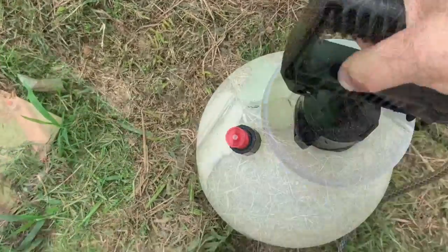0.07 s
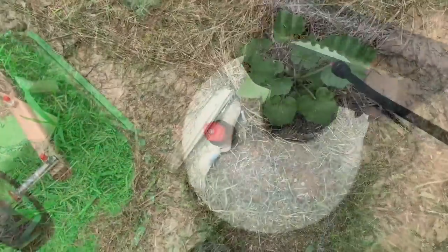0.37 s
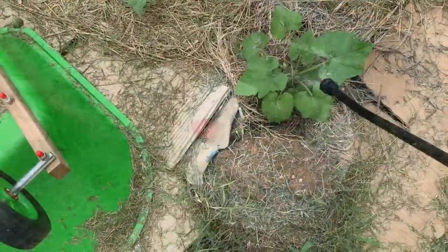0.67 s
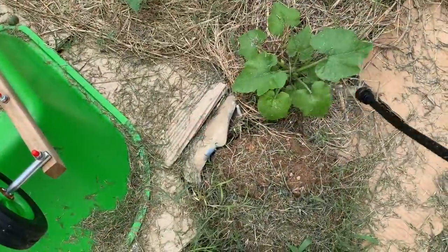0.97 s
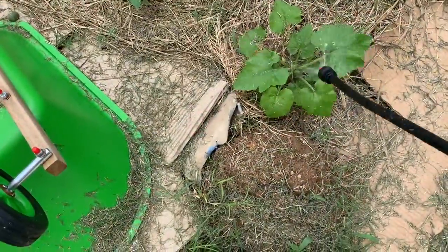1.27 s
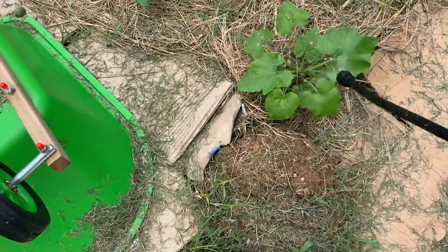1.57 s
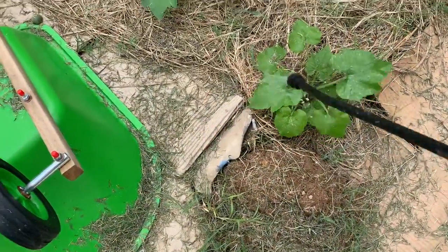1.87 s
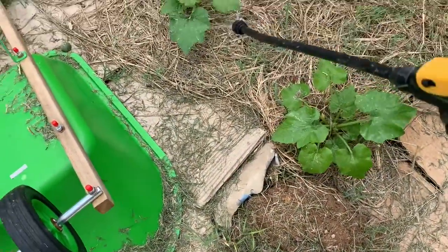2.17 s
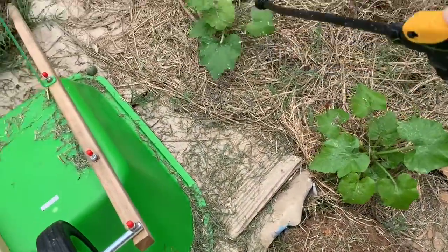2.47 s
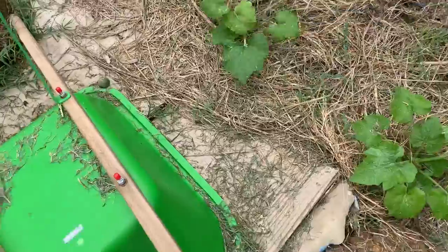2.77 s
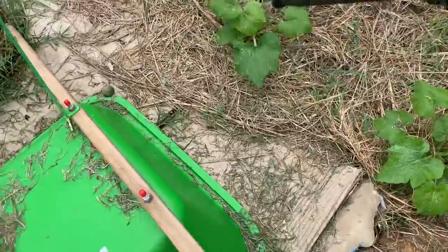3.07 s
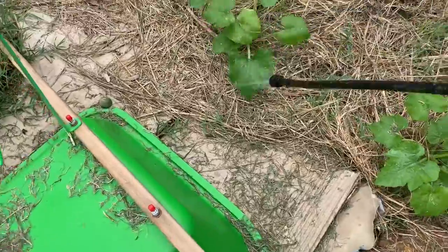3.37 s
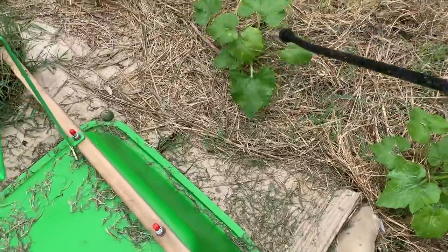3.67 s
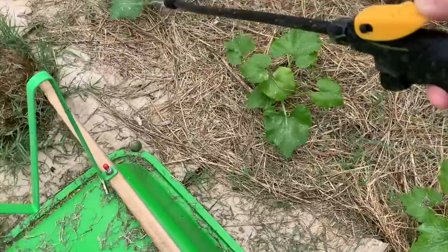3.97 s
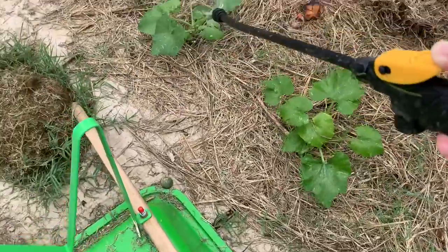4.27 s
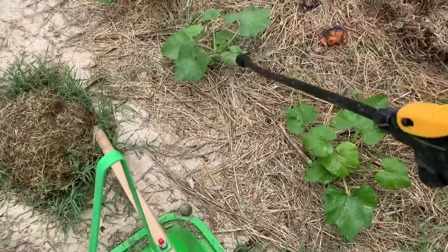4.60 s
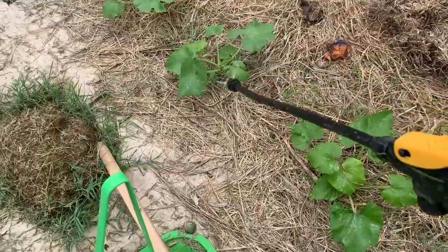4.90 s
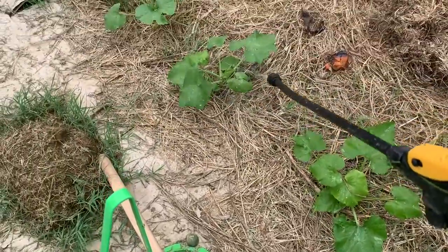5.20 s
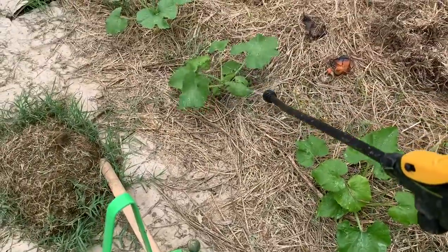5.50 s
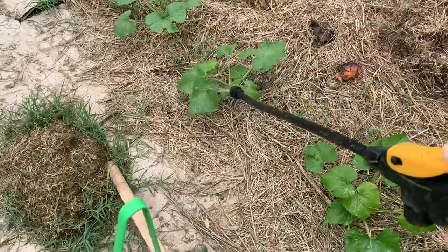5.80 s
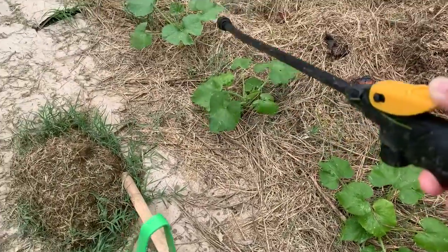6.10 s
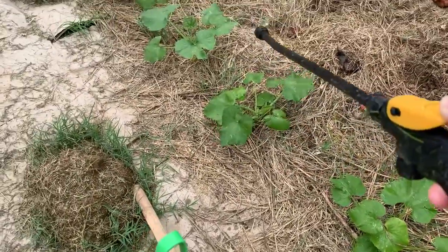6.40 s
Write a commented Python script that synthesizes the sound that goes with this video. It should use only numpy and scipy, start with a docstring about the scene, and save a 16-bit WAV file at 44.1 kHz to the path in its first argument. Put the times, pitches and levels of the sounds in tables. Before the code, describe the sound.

A garden sprayer knocks briefly, then hisses and patters onto leaves and dry straw, with distant engines humming and insects trilling faintly.

```python
"""In a garden, a hand-pumped sprayer is opened and its wand swept over young plants and dry straw mulch.
The plastic pump knocks and scrapes, then mist hisses and drops patter, splashing wherever the jet crosses
a leaf. Fat drops tap and pat on leaves or crack on stalks. Far off, the exhaust pulses of two small
engines hum: one holds steady, the other revs up and sags under load. Insects trill faintly."""
import sys
import numpy as np
from scipy import signal
from scipy.fft import rfft, irfft, next_fast_len
from scipy.io import wavfile
from scipy.ndimage import uniform_filter1d, map_coordinates

SR = 44100
rng = np.random.default_rng(int(sys.argv[2]) if len(sys.argv) > 2 else 0)


def transcribe(u):
    """Save the signal u as a 16-bit wav file named by the first command-line argument.

    u: samples, shape (n,) or (channels, n), limited to [-1, 1]; the rate is SR.
    q: integer samples, one column per channel.
    """
    v = np.clip(np.atleast_2d(u).T, -1, 1)
    q = np.round(v * 32767).astype(np.int16)
    wavfile.write(sys.argv[1], SR, q)


N = 288766

# the spray, louder as the wand nears the ground: time_s, mist_db, patter_db
SPRAY_LEVELS = [(0.55, -46, -54.5), (1.38, -43.5, -51), (1.49, -51, -59), (1.75, -49, -51),
                (1.92, -56, -65), (2.0, -48.5, -55), (2.2, -45, -51.5), (2.5, -41.5, -46.5),
                (2.78, -46.5, -51.5), (3.45, -45.5, -56.5), (3.87, -52, -57.5), (4.15, -51, -56),
                (4.8, -48.5, -52.5), (5.45, -51.5, -57), (6.35, -53.5, -56.5), (6.55, -44.5, -50.5)]
def spray(split_hz=2800):
    """Dense mist makes the hiss, coarser drops the patter; both flutter as the cone brushes stalks."""
    mist_db, patter_db = curves(SPRAY_LEVELS)
    valve, = curves([(.505, 0), (.55, 1)])
    flutter = amp(wobble(55))
    fine = drops(rate=14000, spread_db=1)
    fine += .36 * drops(rate=200, spread_db=1)  # single drops tick on dry stalks
    coarse = drops(rate=1200, spread_db=2)
    mist = filtered(on_ground(fine), lambda hz: 1 / np.sqrt(1 + (split_hz / (hz + 1)) ** 4))
    patter = filtered(on_ground(coarse), lambda hz: 1 / np.sqrt(1 + (hz / split_hz) ** 4))
    mist = unit(patchy(mist, depth_db=1.5)) * amp(mist_db)
    patter = unit(patchy(patter, depth_db=2)) * amp(patter_db + 1.5 * wobble(30))
    return valve * flutter * (mist + patter)


# the jet crosses a leaf: start_s, crest_db, drumming_relative_db, length_s
LEAF_SPLASHES = [(0.516, -40.5, -27, 0.1), (0.606, -40.5, -8, 0.14), (0.784, -38, -24, 0.076),
                 (0.9, -34.5, -20, 0.052), (1.019, -36, -9.5, 0.046), (1.094, -41.5, -8.5, 0.095),
                 (1.269, -40.5, -6, 0.066), (1.336, -43.5, -25, 0.038), (1.389, -43, -7, 0.074),
                 (1.501, -40.5, -27, 0.15), (1.647, -40, -5.5, 0.068), (1.741, -42.5, -7.5, 0.16),
                 (2.332, -43.5, -3.5, 0.14), (2.526, -37.5, -10.5, 0.2), (2.802, -42.5, -21, 0.11),
                 (3.032, -41, -8.5, 0.18), (3.183, -39.5, -15, 0.054), (3.272, -35, -9.5, 0.054),
                 (3.377, -38.5, -3, 0.03), (3.49, -35.5, -2.5, 0.045), (3.553, -42, -5, 0.13),
                 (3.726, -45, 0.5, 0.09), (3.95, -50, 3.5, 0.082), (4.178, -56, 5, 0.1),
                 (4.396, -55, 4, 0.092), (4.842, -47.5, -9, 0.046), (5.02, -42.5, -5.5, 0.041),
                 (5.261, -45, -8, 0.14), (5.546, -45.5, -3.5, 0.065), (5.665, -44, -17, 0.1),
                 (6.015, -47.5, -2.5, 0.058), (6.216, -48, -12, 0.054), (6.397, -49.5, -5, 0.09)]
def splashes(soft_hz=12000):
    """A leaf in the jet drums under a shower that swells and fades as the cone crosses it."""
    t = np.arange(N) / SR
    shower, drumming = np.zeros(N), np.zeros(N)
    for start, db, drum_db, length in LEAF_SPLASHES:
        swell = np.abs(np.sin(np.pi * np.clip((t - start) / length, 0, 1))) ** .85
        shower += amp(db) * swell
        drumming += amp(db + drum_db) * swell
    wet = on_ground(drops(rate=9000, spread_db=1))
    wet = filtered(wet, lambda hz: 1 / np.sqrt(1 + (hz / soft_hz) ** 4))  # soft leaves dull the top
    leaf_eq = [(250, -15), (550, -2.5), (950, -2), (1900, 1.5), (3500, 4), (8000, -24.5)]
    drum = coloured(drops(rate=1500, spread_db=3), leaf_eq)
    clumps = amp(1.6 * wobble(220))
    return shower * clumps * wet + drumming * drum


# tone of water on leaves and on straw: freq_hz, gain_db
LEAVES_EQ = [(150, -9), (500, -13.5), (700, -10.5), (950, 2), (1300, -13.5), (1800, 2.5), (2150, 0),
             (2600, -6), (3800, 4), (5600, 2), (8000, -1), (11000, -2.5), (15500, -8)]
STRAW_EQ = [(150, 2), (520, -8), (1000, 1), (1700, 0), (2800, -1.5), (3800, 4), (5400, 3), (7000, 2),
            (10000, 1.5), (12000, -3.5), (15500, -5)]
def on_ground(x):
    """The jet first plays on broad leaves, then crossfades to straw."""
    straw, = curves([(1.85, 0), (2.0, 1)])
    return np.sqrt(1 - straw) * coloured(x, LEAVES_EQ) + np.sqrt(straw) * coloured(x, STRAW_EQ)


# fat drops on leaves: start_s, level_db, body_relative_db, ring_relative_db
LEAF_TAPS = [(2.2563, -21, -9, 1), (2.337, -33, -8, -12), (2.3689, -21, -7.5, -9), (2.523, -29, -19, -13),
             (2.841, -28.5, -17, -8), (2.991, -27.5, -10, -8), (3.499, -28, -16, -7), (3.663, -32, -38, -7),
             (3.966, -46, -5, -9), (4.031, -25.5, -28, -1.5), (4.318, -29.5, -28, -13),
             (4.532, -41, -27, -12)]
# a tap's bright snap and low body: freq_hz, gain_db
SNAP_EQ = [(300, -6.5), (1200, 2.5), (2700, 5), (4000, 0), (7000, -2), (15000, -20)]
BODY_EQ = [(200, -16), (450, -8), (680, 13.5), (900, 8), (1200, 11.5), (2000, 5.5), (6000, -51)]
# leaf and stalk ring briefly: pitch_hz, relative_db, t60_s
LEAF_MODES = [(2414, -6, 0.022), (2880, -8, 0.015), (4100, -13, 0.03)]
def taps():
    """A fat drop bends a leaf; high bending waves outrun low ones, so each tap is a falling chirp."""
    starts, db, body_db, ring_db = np.transpose(LEAF_TAPS)
    blows = lambda level_db: np.bincount((starts * SR).astype(int), amp(level_db), N)[:N]
    snap = coloured(blows(db + 11), SNAP_EQ)
    body = coloured(blows(db + body_db + 21.5), BODY_EQ)
    slowness = 0.0694  # each frequency arrives slowness / sqrt(hz) seconds late
    chirp = filtered(snap + body, lambda hz: np.exp(-4j * np.pi * slowness * np.sqrt(hz)))
    spatter = coloured(clicks(starts, db + 4, t60=.014), SNAP_EQ)
    ring = ringing(LEAF_MODES, np.arange(SR // 20) / SR)
    return chirp + spatter + signal.oaconvolve(blows(db + ring_db), ring)[:N]


# drops on dry stalks: start_s, level_db
STALK_CRACKS = [(0.9133, -25), (1.3483, -25), (2.465, -21.5), (2.5523, -31), (3.045, -26), (3.259, -34),
                (3.7526, -28), (4.054, -30), (4.104, -31), (4.363, -35), (4.8653, -28), (5.053, -34),
                (5.273, -27), (5.557, -32), (5.891, -27), (5.941, -35)]
# a stalk's brittle tone: freq_hz, gain_db
STALK_EQ = [(500, -2), (1800, -2), (3600, 1), (6000, 18.5), (9000, 6), (15000, -4)]
def cracks(small_per_s=26, spray_on_s=.55):
    """A drop bursts on a stalk into brief spatter; smaller ones crackle along with the mist."""
    starts, db = np.transpose(STALK_CRACKS)
    when, strength = rng.random((int(small_per_s * N / SR), 2)).T
    times = spray_on_s + when * (N / SR - spray_on_s)
    mist_db = np.interp(times, *np.transpose(SPRAY_LEVELS)[:2])
    crackle = unit(clicks(times, mist_db + 8 * strength, t60=.016))
    crackle *= amp(np.mean(mist_db) - 11)  # tucked under the mist
    return coloured(clicks(starts, db + 8, t60=.028) + crackle, STALK_EQ)


# drops on cupped leaves: start_s, level_db, pitch_hz
HOLLOW_PATS = [(1.953, -41, 1530), (2.0048, -41, 1450), (2.0948, -41.5, 1460), (4.008, -36, 1890),
               (4.2071, -35, 1755), (4.2324, -40, 2080), (4.432, -34.5, 1778), (4.4709, -40.5, 1730),
               (4.7522, -46, 1416), (4.8615, -37, 1705), (5.0896, -36.5, 1815), (5.1296, -41.5, 1779),
               (5.1763, -43, 1780)]
# a cupped leaf's resonance: freq_hz, gain_db
CUP_EQ = [(400, 4), (1000, -20), (1400, 7.5), (1750, 15), (2300, -2), (5000, -11), (15000, -20)]
def pats():
    """Larger drops pat hollowly on cupped leaves, each at its own pitch, among softer strays."""
    cup_hz = max(CUP_EQ, key=lambda point: point[1])[0]
    tuned = lambda pitch: [(hz * pitch / cup_hz, db) for hz, db in CUP_EQ]
    struck = sum(coloured(clicks([s], [db + 19], t60=.095), tuned(pitch)) for s, db, pitch in HOLLOW_PATS)
    stray_db, = curves([(1.8, -120), (1.95, -66), (6.5, -66)])
    strays = patchy(drops(rate=110, spread_db=1), depth_db=2) * amp(stray_db)
    return struck + coloured(strays, CUP_EQ)


# low plops: start_s, pitch_hz, level_db
SOFT_PLOPS = [(0.355, 720, -54), (3.968, 580, -40), (4.222, 560, -38), (4.469, 527, -42)]
def plops(attack_s=.0017, t60_s=.046):
    """Soft plops, each a dying sine with a rounded attack."""
    out = np.zeros(N)
    for start, hz, db in SOFT_PLOPS:
        age = np.maximum(np.arange(N) / SR - start, 0)
        out += (1 - np.exp(-age / attack_s)) * ringing([(hz, db, t60_s)], age)
    return out


# the hollow tank: pitch_hz, level_db, t60_s
TANK_MODES = [(320, -40, 0.08), (367, -45, 0.11), (710, -55, .04), (1073, -48, 0.05)]
# fades of the handle's scrape and the sliding rod's thin ring: time_s, level_db
SCRAPE_LEVELS = [(0, -56.5), (.035, -48), (.048, -59), (.1, -56.5), (.112, -78), (.25, -76), (.35, -120)]
ROD_LEVELS = [(0, -72), (.05, -67), (.14, -70), (.21, -77), (.26, -76), (.36, -79), (.45, -110)]
# handle and trigger ticks: start_s, level_db
PLASTIC_TICKS = [(0.0234, -52), (0.059, -41.5), (0.074, -54), (0.081, -40.5), (0.096, -47), (0.4653, -65),
                 (0.477, -61), (0.5057, -47), (0.872, -38), (0.888, -31)]
# tone of the scrape, the rod and the ticks: freq_hz, gain_db
SCRAPE_EQ = [(150, -7), (340, 15), (550, 3), (1000, 6), (1600, -2.5), (4500, 2), (7000, -4), (15000, -1.5)]
ROD_EQ = [(1500, -40), (2250, -9), (2470, 3), (2700, -9), (3300, -6), (4500, -26)]
PLASTIC_EQ = [(300, -13), (2000, -1.5), (4500, -3), (6500, 6), (9000, -3), (15000, -5)]
def handle(knock_at_s=.018, attack_s=.0037):
    """The plastic handle knocks on the tank, its rod scrapes and rings, and the trigger clicks open."""
    age = np.maximum(np.arange(N) / SR - knock_at_s, 0)
    knock = ringing(TANK_MODES, age) * (1 - np.exp(-age / attack_s))
    scrape = amp(curves(SCRAPE_LEVELS)[0]) * coloured(drops(rate=4900, spread_db=-1), SCRAPE_EQ)
    rod_db = curves(ROD_LEVELS)[0] + 2.3 * wobble(26.3)
    rod = amp(rod_db) * coloured(drops(rate=3200, spread_db=0), ROD_EQ)
    starts, db = np.transpose(PLASTIC_TICKS)
    ticks = coloured(clicks(starts, db + 18, t60=.018), PLASTIC_EQ)
    return knock + scrape + rod + ticks


# stereo phase of the close sounds: freq_hz, left_lead_rad
STEREO_PHASE = [(0, 0), (350, 0), (700, -1), (1100, -.5), (1700, .05), (3200, 1.25), (4000, 2.05),
                (4720, 3.14), (6750, 6.28), (15200, 18.85), (22050, 29)]
def close_stereo(x, size=512):
    """Close sound arrives mostly left first, followed by weak ground scatter, mainly from the sides."""
    lead = lambda hz: np.interp(hz, *np.transpose(STEREO_PHASE))
    direct = filtered(x, lambda hz: np.exp(.5j * np.array([lead(hz), -lead(hz)])))
    tails = rng.standard_normal((2, size)) * np.hanning(size)
    front, side = [convolved(x, tail) for tail in tails]
    scatter = np.array([side, -side]) + amp(-5) * front
    straw_loss = lambda hz: amp(np.interp(hz, [2500, 5000], [-11.5, -13]))  # straw soaks up treble
    return direct + filtered(scatter, straw_loss)


# exhaust harmonics: firing_multiple, level_db
EXHAUST_HARMONICS = [(1, -4.5), (2, -3.5), (3, -8.5), (4, -10.5), (5, -19), (6, -16.5), (7, -25.5),
                     (8, -20), (9, -28.5)]
# the engine's level drifts with distance: time_s, level_db
REVVING_LEVELS = [(1.6, -73), (1.85, -47), (2.2, -48), (2.85, -44.5), (3.4, -51), (3.75, -49), (4.15, -46),
                  (5.0, -47), (6.25, -47.5), (6.55, -46.5)]
# its second harmonic swells and fades: time_s, boost_db
SECOND_HARMONIC = [(2.5, -2), (2.77, 4), (3.1, 1.5), (3.65, -1.5), (4.15, 1.5), (4.5, -4), (5.6, -5),
                   (6.0, 2), (6.27, 4), (6.5, -5)]
def revving_engine(idle_hz=50.67, governed_hz=77.37, louder_db_per_hz=.22):
    """An engine comes up from idle and labours, quieter when slower; no two firings are alike."""
    throttle, firing_hz = governor(idle_hz, governed_hz)
    level_db = curves(REVVING_LEVELS)[0] + louder_db_per_hz * (firing_hz - governed_hz)
    cycles = np.cumsum(firing_hz * (1 + .004 * wobble(45))) / SR
    level_db += 1.3 * wobble(50)
    second_db, = curves(SECOND_HARMONIC)
    harmonics = [(k, db + (k == 2) * second_db) for k, db in EXHAUST_HARMONICS]
    hum = amp(level_db) * exhaust(cycles, harmonics, waver_db=1.3, waver_rate=9, smear_rad=.57)
    # an open throttle sharpens the pulses
    upper = filtered(hum, lambda hz: 1 / (1 + (200 / (hz + 1)) ** 8))
    upper_db = -.5 - 41 * (1 - throttle) ** 2
    return hum + (amp(upper_db) - 1) * upper


# loads drag the engine down: centre_s, drop_hz, half_width_s
LOAD_SAGS = [(2.5, 4.6, 0.22), (2.88, 1.003, 0.2003), (3.148, 2.7, 0.083), (3.944, 2.31, 0.11),
             (4.301, 5.21, 0.0789), (4.68, 6.7, 0.11), (5.273, 12.3, 0.17), (5.714, 3.83, 0.084),
             (5.897, 10, 0.13), (6.526, 2.7, 0.19)]
def governor(idle_hz, governed_hz, run_up_at_s=2.16, run_up_s=.073):
    """Throttle (0-1) and firing rate: a run-up from idle, then a sag and recovery under each load."""
    t = np.arange(N) / SR
    throttle = .5 + .5 * np.tanh((t - run_up_at_s) / (2 * run_up_s))
    sag_hz = sum(drop_hz * np.exp(-((t - s) / width) ** 2) for s, drop_hz, width in LOAD_SAGS)
    return throttle, idle_hz + (governed_hz - idle_hz) * throttle - sag_hz


# the ground bounce shortens and weakens as the engine moves: time_s, lag_ms, gain
GROUND_BOUNCE = [(3.9, 1.315, 0.75), (4.8, 1.01, 0.55)]
# slapback from far walls: delay_s, level_db
WALL_ECHOES = [(.11, -11), (.23, -10)]
def reflections(x, t60_s=1.1):
    """A sound phases against its ground bounce; walls and trees return its overtones as echo and tail."""
    lag_ms, gain = curves(GROUND_BOUNCE)
    x = x + gain * delayed(x, lag_ms / 1000)
    overtones = filtered(x, lambda hz: 1 / (1 + (170 / (hz + 1)) ** 4))
    echoes = sum(amp(db) * delayed(overtones, lag_s) for lag_s, db in WALL_ECHOES)
    t = np.arange(SR) / SR
    tail = rng.standard_normal(SR) * amp(-60 * t / t60_s)
    return x + echoes + amp(-11) * convolved(overtones, tail)


# the steady engine's harmonics: cycle_multiple, level_db
DRONE_HARMONICS = [(3, -60), (4, -54.5), (5, -59.5), (6, -53), (7, -63), (8, -55.5), (9, -74), (11, -76)]
# its mix: time_s, drone_gain_db, rumble_db
STEADY_LEVELS = [(0, -2.5, -54.5), (.35, -5, -59), (.8, 0.5, -61.5), (1.8, 1, -56), (2.5, 0, -55.5),
                 (4, -3.5, -53), (6.5, 0.5, -51.5)]
# its exhaust rumble: freq_hz, gain_db
RUMBLE_EQ = [(20, -29), (40, 0), (60, -4), (100, 4.5), (140, -3.5), (200, -0.5), (300, -14.5), (500, -33.5),
             (1500, -54)]
def steady_engine(cycle_hz=19.55, thump_at_s=.662):
    """Harmonics line up into one thump a cycle, some harder than others, over a noisy rumble."""
    drone_db, rumble_db = curves(STEADY_LEVELS)
    cycles = (np.arange(N) / SR - thump_at_s) * cycle_hz + .008 * wobble(8)
    drone_db += 1.3 * wobble(cycle_hz)
    drone = amp(drone_db) * exhaust(cycles, DRONE_HARMONICS, waver_db=1.5, waver_rate=7, smear_rad=.6)
    return drone + amp(rumble_db) * coloured(rng.standard_normal(N), RUMBLE_EQ)


def exhaust(cycles, harmonics, waver_db, waver_rate, smear_rad):
    """Harmonics of exhaust pulses, each wavering in the air and drifting out of step."""
    out = np.zeros(N)
    for k, db in harmonics:
        gain = amp(db + waver_db * wobble(waver_rate))
        out += gain * np.cos(k * 2 * np.pi * cycles + smear_rad * wobble(1.976))
    return np.sqrt(2) * out


def engines():
    """Both far engines sit to the left, their overtones more so than their bass."""
    both = reflections(revving_engine()) + steady_engine()
    left_db = lambda hz: np.interp(hz, [60, 150, 280], [.9, 2.6, 4.5])
    return filtered(both, lambda hz: amp(np.array([left_db(hz), -left_db(hz)]) / 2))


# the outdoor hush: time_s, level_db
HUSH_LEVELS = [(0, -68), (.15, -60), (.28, -69), (.42, -73.5), (.6, -66), (2.0, -68)]
# its tone: freq_hz, gain_db
HUSH_EQ = [(200, 10.5), (500, -1), (1000, -2), (1600, -2), (2500, -1.5), (4500, -7), (6000, -10),
           (7500, -1.5), (9500, -38), (15000, -21)]
def air():
    """A bed of outdoor hush and a wash of scattered engine noise, leaning left."""
    hush = amp(curves(HUSH_LEVELS)[0]) * wide_noise(HUSH_EQ)
    wash_db, = curves([(0, -76), (.45, -78), (1.8, -59), (2.5, -57), (6.5, -56.5)])
    wash_eq = [(60, -13), (220, -7.5), (400, -6.5), (620, -10), (1000, -14), (2600, -10), (12000, -94)]
    return hush + amp(wash_db) * wide_noise(wash_eq) * amp([[1.5], [-1.5]])


# far insects fade in: time_s, level_db
INSECT_LEVELS = [(.45, -99), (2.0, -64), (4.2, -59.5), (5.0, -59), (6.3, -58.5), (6.55, -57)]
def insects():
    """A thin trill from all around: a narrow band of flickering noise."""
    trill_eq = [(1900, -39), (2450, -5), (2640, 5), (2780, 0), (2950, -2), (3500, -26), (8000, -72)]
    return wide_noise(trill_eq) * amp(curves(INSECT_LEVELS)[0] + 2.6 * wobble(10))


def amp(db):
    """Decibels to gain."""
    return 10 ** (np.asarray(db) / 20)


def unit(x):
    """x scaled to rms 1."""
    return x / np.sqrt(np.mean(x ** 2) + 1e-20)


def curves(rows):
    """A per-sample automation curve for each column after the time."""
    times, *columns = np.transpose(rows)
    return [np.interp(np.arange(N) / SR, times, column) for column in columns]


def wobble(rate):
    """A smooth random curve, rate knots a second."""
    return map_coordinates(rng.standard_normal(int(N * rate / SR) + 4), [np.arange(N) * rate / SR])


def drops(rate, spread_db):
    """Random impacts of uneven size, rate a second, at rms 1."""
    hits = (rng.random(N) < rate / SR) * rng.standard_normal(N)
    return unit(hits * amp(spread_db * np.clip(rng.standard_normal(N), -2, 2)))


def clicks(times, levels_db, t60, size=1024):
    """A tiny dying noise burst at each time, its energy set by its level."""
    out, t = np.zeros(N + size), np.arange(size) / SR
    for s, db in zip(times, levels_db):
        burst = rng.standard_normal(size) * amp(-60 * t / t60)
        out[max(round(s * SR), 0):][:size] += amp(db) * burst / np.linalg.norm(burst)
    return out[:N]


def ringing(modes, age):
    """Dying sines, age seconds after the strike."""
    return sum(amp(db - 60 * age / t60) * np.sin(2 * np.pi * hz * age) for hz, db, t60 in modes)


def wide_noise(eq):
    """Coloured noise, independent left and right."""
    return np.array([coloured(rng.standard_normal(N), eq) for _ in range(2)])


def filtered(x, response):
    """x through a complex frequency response."""
    size = next_fast_len(N + 8192)
    return irfft(rfft(x, size) * response(np.fft.rfftfreq(size, 1 / SR)), size)[..., :N]


def convolved(x, kernel):
    """x through an impulse response scaled to energy 1."""
    return signal.oaconvolve(x, kernel / np.linalg.norm(kernel))[:N]


def coloured(x, eq, size=4096):
    """x through a minimum-phase EQ of energy 1, shaped by (freq_hz, gain_db) points."""
    hz, db = np.transpose(eq)
    gain = amp(np.interp(np.log(np.fft.rfftfreq(size, 1 / SR) + 1), np.log(hz), db))
    cepstrum = irfft(np.log(gain))
    cepstrum[1:size // 2] *= 2
    cepstrum[size // 2 + 1:] = 0
    return convolved(x, irfft(np.exp(rfft(cepstrum))))


def patchy(x, depth_db):
    """x with random patches of gain over time and frequency."""
    spectrum = signal.stft(x, nperseg=512)[2]
    patches = uniform_filter1d(rng.standard_normal(spectrum.shape), size=6, axis=0)
    patches = uniform_filter1d(patches, size=10, axis=1)
    return signal.istft(spectrum * amp(depth_db * unit(patches)), nperseg=512)[1][:N]


def delayed(x, lag_s):
    """x heard later, by a constant or slowly changing lag."""
    t = np.arange(N) / SR
    return np.interp(t - lag_s, t, x, left=0)


def scene():
    """The sprayer close by, over distant engines, air and insects."""
    sprayer = spray() + splashes() + taps() + cracks() + pats() + plops() + handle()
    return close_stereo(sprayer) + engines() + air() + insects()


def record(dry):
    """A low cut and a brick-wall high cut on the whole mix."""
    low_cut_hz, top_hz = 34, 15850
    return filtered(dry, lambda hz: (hz < top_hz) / np.sqrt(1 + (low_cut_hz / (hz + 1)) ** 8))


dry = scene()
out = record(dry)
transcribe(out)
```